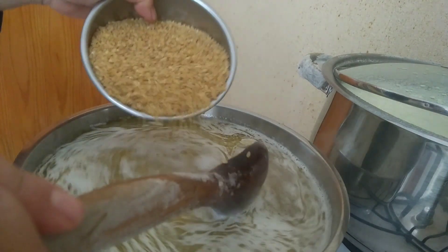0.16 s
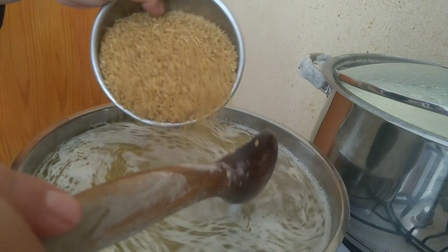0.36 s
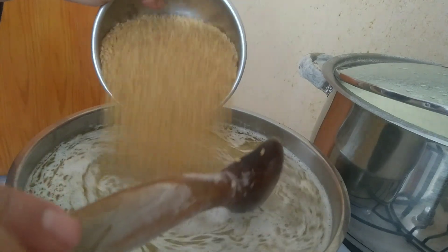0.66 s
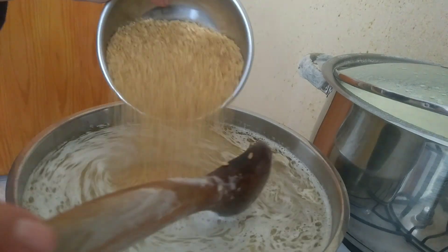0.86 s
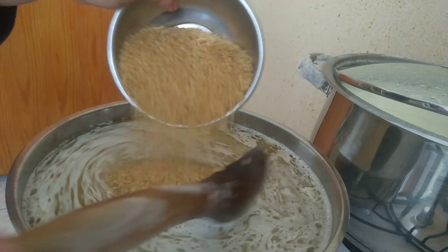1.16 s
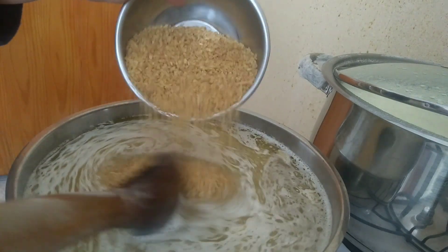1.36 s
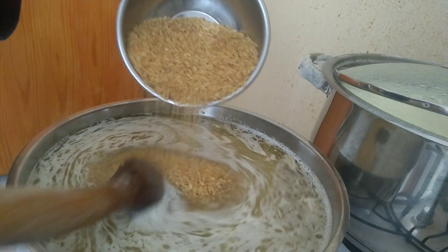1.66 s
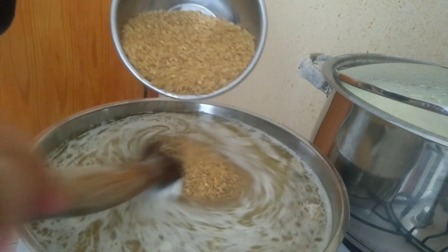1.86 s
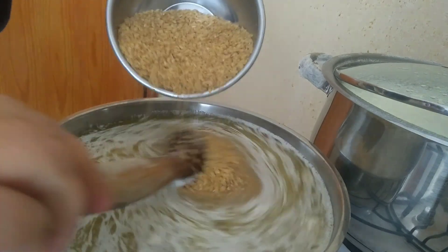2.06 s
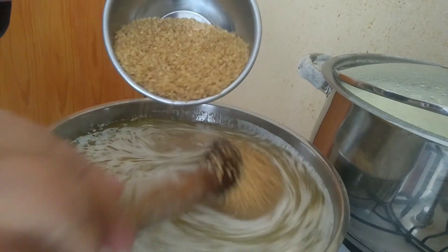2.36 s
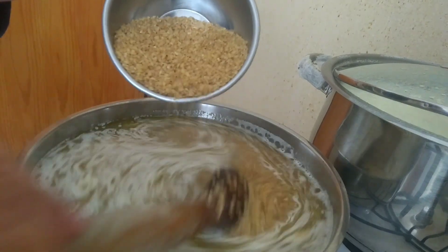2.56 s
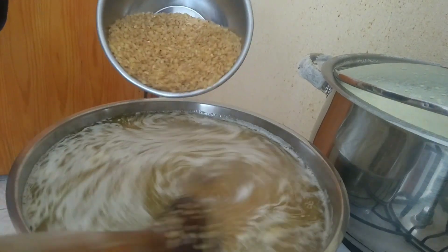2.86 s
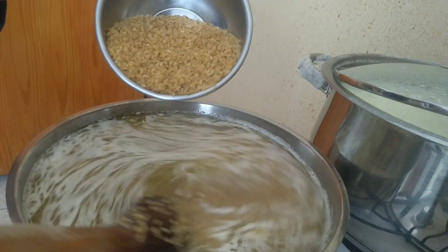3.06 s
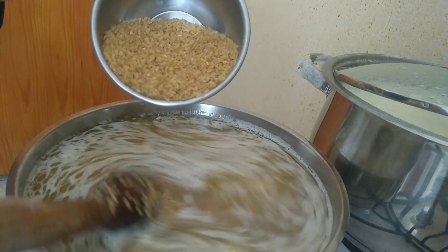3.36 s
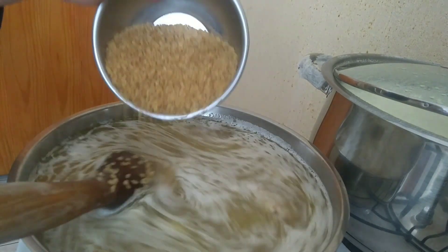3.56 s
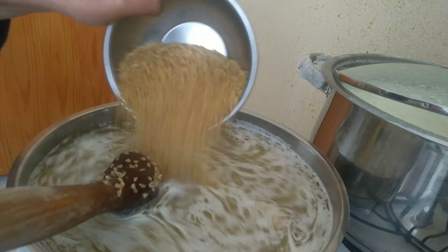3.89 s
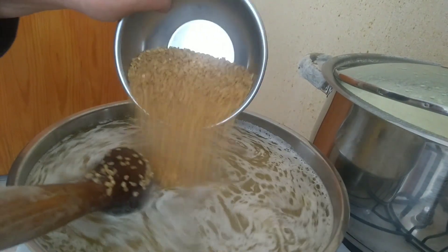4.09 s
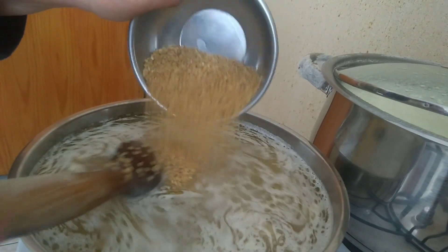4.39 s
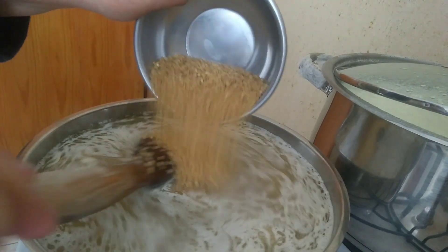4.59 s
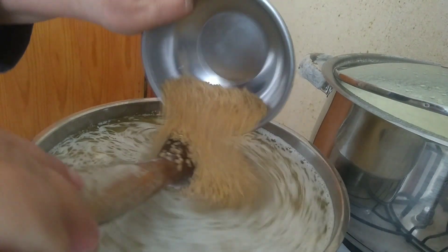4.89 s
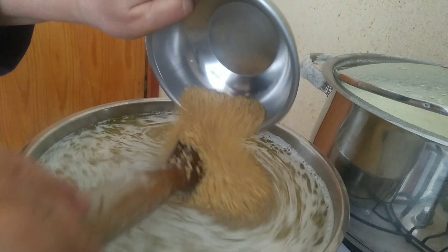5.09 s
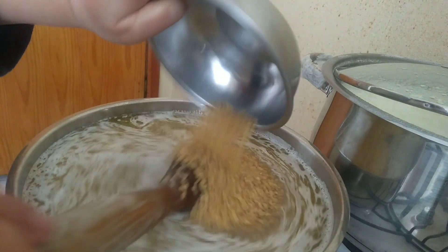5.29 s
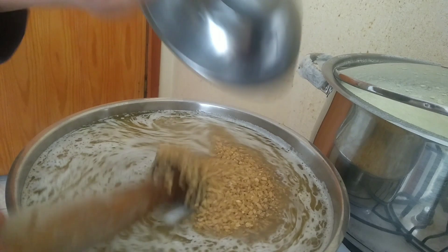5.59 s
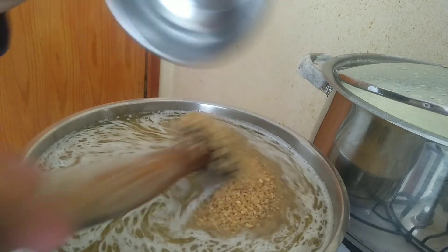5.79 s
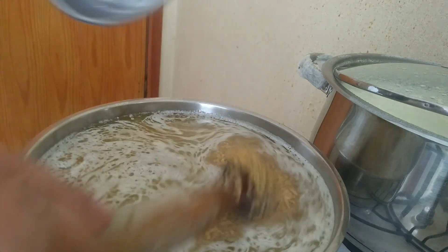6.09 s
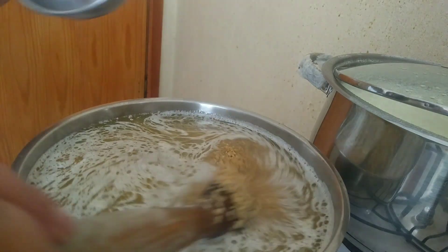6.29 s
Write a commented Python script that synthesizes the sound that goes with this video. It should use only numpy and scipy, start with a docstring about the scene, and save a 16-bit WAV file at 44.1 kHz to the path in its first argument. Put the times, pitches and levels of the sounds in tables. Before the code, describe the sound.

Beside a quietly simmering pot, grain slides and then pours sharply, a dense crisp patter on steel over watery plops. It trickles away into ticks. A wooden spoon raps the pot in a quick cluster, drags, and flicks foam. Grain pours again, longer and uneven, with a metallic singing edge, then stops. Faint splashes, a small spill of grains and muted knocks finish. Near stereo microphone, short kitchen reverberation.

```python
"""Dry bulgur slides from a steel bowl into a big pot of simmering broth, in two pours, in a small kitchen.
Each grain is a click that rings briefly: thousands a second patter on steel, plop in broth and fizz in foam.
A wooden spoon knocks on the pot as noise scuffs and ringing modes, drags as slips and splashes as noise bursts.
Big steam bubbles thud as low tones; behind them lie the stove's coloured noise, a simmer and a mains hum.
A stereo pair of microphone ports hears it: the struck pot wall is nearer to the right one."""
import sys
import numpy as np
from scipy import signal
from scipy.fft import rfft, irfft
from scipy.io import wavfile

SR = 44100
rng = np.random.default_rng(int(sys.argv[2]) if len(sys.argv) > 2 else 0)


def file_out(sig):
    """Save sig as 16-bit WAV at sys.argv[1]."""
    # one column per channel
    cols = np.atleast_2d(sig).T
    # limit, then scale
    lim = np.clip(cols, -1, 1)
    pcm = np.round(lim * 32767).astype(np.int16)
    wavfile.write(sys.argv[1], SR, pcm)


N = 283993
TIME = np.arange(N) / SR

# how long the small kitchen lingers: band_hz, t60_s
KITCHEN_DECAY = [(150, 0.42), (600, 0.27), (2000, 0.45), (6000, 0.26), (15000, 0.22)]


def from_db(db):
    """Decibels to gain."""
    return 10 ** (np.asarray(db) / 20)


def rms_one(x):
    """Scale to rms 1."""
    return x / np.sqrt(np.mean(x ** 2) + 1e-20)


def at_hz(points, hz):
    """Read a table on a log-frequency axis."""
    points = np.array(points)
    return np.interp(np.log(np.maximum(hz, 1)), np.log(points[:, 0]), points[:, 1])


def colour(x, spectrum, size=4096):
    """Causal (minimum-phase) filter with the given spectrum."""
    cepstrum = irfft(np.log(from_db(at_hz(spectrum, np.fft.rfftfreq(size, 1 / SR)))))
    # fold the cepstrum forward in time
    cepstrum[1:size // 2] *= 2
    cepstrum[size // 2 + 1:] = 0
    kernel = irfft(np.exp(rfft(cepstrum)))
    return signal.fftconvolve(np.atleast_2d(x), kernel[None], axes=1)[:, :x.shape[-1]]


def drift(rate):
    """Random wander: straight lines between knots of rms 1, `rate` knots a second."""
    knots = rng.standard_normal(int(N / SR * rate) + 2)
    return np.interp(TIME * rate, np.arange(len(knots)), rms_one(knots))


def resonate(x, hz, width_hz):
    """A resonance with gain 1 on top."""
    r = np.exp(-np.pi * width_hz / SR)
    feedforward = np.array([1, 0, -1]) * (1 - r * r) / 2
    feedback = [1, -2 * r * np.cos(2 * np.pi * hz / SR), r * r]
    return signal.lfilter(feedforward, feedback, x + 1e-18)


def ring_modes(x, modes):
    """Sum of resonances given as mode_hz, width_hz, level_db."""
    return sum(from_db(db) * resonate(x, hz, width_hz) for hz, width_hz, db in modes)


def band_pass(x, low_hz, high_hz):
    """Second-order band filter."""
    return signal.sosfilt(signal.butter(2, [low_hz, high_hz], "band", fs=SR, output="sos"), x)


def diffuse(size):
    """Stereo noise, alike in the bass and unrelated in the treble."""
    # side noise against mid noise: band_hz, side_db
    width = [(50, -41), (125, -20), (250, -11), (500, -4.5), (1000, -1), (2000, -0.5), (4000, -1.5),
             (15000, 0)]
    mid, side = rng.standard_normal((2, size))
    return (mid + colour(side, width) * [[1], [-1]]) / np.sqrt(2)


def burst(decay_s, size=4096):
    """A contact: stereo noise dying at once, mean energy 1 per channel."""
    x = diffuse(size) * np.exp(-np.arange(size) / SR / decay_s)
    return rms_one(x) / np.sqrt(size)


def add(out, s, x):
    """Mix a sound in at time s."""
    start = max(int(s * SR), 0)
    out[:, start:start + x.shape[1]] += x[:, :N - start]


def kitchen(x, wet_db, size=26000):
    """Direct sound plus a diffuse tail that dies octave by octave."""
    t, noise, tail = np.arange(size) / SR, diffuse(size), 0
    edges_hz = 65 * 2. ** np.arange(9)
    for low_hz, high_hz in zip(edges_hz, edges_hz[1:]):
        t60_s = at_hz(KITCHEN_DECAY, np.sqrt(low_hz * high_hz))
        tail = tail + band_pass(noise, low_hz, high_hz) * from_db(-60 * t / t60_s)
        noise = diffuse(size)
    tail = rms_one(tail * np.clip(t / 0.0022, 0, 1)) / np.sqrt(size)
    return x + from_db(wet_db) * signal.fftconvolve(x, tail, axes=1)[:, :N]


def place(x, side):
    """Tilt stereo sound between the ports, band by band, roughly keeping its power."""
    left = [(hz, db - 10 * np.log10((1.5 + 10 ** (db / 10)) / 2)) for hz, db in side]
    right = [(hz, -10 * np.log10((2 + 10 ** (db / 10)) / 2)) for hz, db in side]
    return np.vstack([colour(x[0], left), colour(x[1], right)])


def in_time(rows):
    """Join (s, dB) rows by straight lines, as a gain that dies away outside them."""
    edge_s = 0.063
    s, db = np.transpose(rows)
    outside_s = np.maximum(np.maximum(s[0] - TIME, TIME - s[-1]), 0)
    return from_db(np.interp(TIME, s, db)) * np.exp(-outside_s / edge_s)


def bell_swells(rows):
    """Sum of bell-shaped swells given as centre_s, level_db, half_s (half length to 1/e)."""
    return sum(from_db(db) * np.exp(-((TIME - s) / half_s) ** 2) for s, db, half_s in rows)


def stove():
    """Burner rumble, a faint, fitful simmer coloured by the pot, and a slightly wavering hum."""
    # colour of the burner rumble: band_hz, level_db
    rumble_colour = [(25, -6), (45, -6), (70, -3.5), (105, -1), (140, 7.5), (180, -9), (260, -9.5),
                     (450, -22.5), (800, -24), (1600, -32), (2300, -36.5), (6000, -34.5), (9000, -44.5),
                     (15000, -69)]
    # pot resonances over the simmer: mode_hz, width_hz, level_db
    simmer_modes = [(839, 14, -2), (1630, 66, -1), (2823, 15, 1.5), (3405, 58, -7)]
    # mains hum: pitch_hz, rms_db
    hum_tones = [(49.2, -59), (99.5, -70.5)]
    rumble = from_db(-64.5) * rms_one(colour(diffuse(N), rumble_colour))
    fizz = diffuse(N)
    simmer = sum(from_db(db + 6.2 * drift(12)) * resonate(fizz, hz, width_hz)
                 for hz, width_hz, db in simmer_modes)
    hum = 0
    for hz, db in hum_tones:
        level = np.sqrt(2) * from_db(db + 0.5 * drift(0.29))
        hum = hum + level * np.sin(2 * np.pi * hz * TIME + 0.44 * drift(1.1))
    return rumble + from_db(-75.5) * rms_one(simmer) + hum


def thuds():
    """Steam bubbles swell and collapse at the bottom in a few low cycles, with one overtone."""
    # big steam bubbles: start_s, level_db (before a 5 dB trim), pitch_hz
    bubbles = [(0.759, -45.5, 100), (0.832, -46, 145), (3.18, -62, 142.5), (3.649, -46, 142.6),
               (3.755, -47, 144), (4.823, -39.5, 141.5), (5.17, -47.5, 127), (5.979, -51, 134)]
    out, t = np.zeros((2, N)), np.arange(SR // 4) / SR
    swell = t / 0.011   # fullest after 11 ms
    for s, db, hz in bubbles:
        tone = np.sin(2 * np.pi * hz * t) + from_db(-13.5) * np.sin(2 * np.pi * 1.546 * hz * t)
        add(out, s, from_db(db - 5.0) * (swell * np.exp(1 - swell) * tone)[None])
    return out


def judder():
    """The spoon drags over the bottom in quick, nearly regular slips that make the pot groan."""
    # drags of the spoon: centre_s, level_db, half_s
    drags = [(2.697, -59.5, 0.031), (2.871, -44, 0.035), (2.941, -55, 0.0077)]
    # colour of the groan: band_hz, level_db
    groan_colour = [(80, -33), (146, -8), (220, 0.5), (293, 2.5), (375, -2.5), (450, -16), (513, -15.5),
                    (700, -18), (1400, -32), (3000, -50), (8000, -80)]
    slips_per_s, waver = 73.3, 0.016
    slip_count = np.cumsum(slips_per_s * (1 + waver * drift(40))) / SR
    slips = np.diff(np.floor(slip_count), prepend=0)   # one click per whole count
    groan = rms_one(colour(slips * from_db(1.5 * drift(70)), groan_colour))
    return kitchen(np.vstack([groan, groan]) * bell_swells(drags), wet_db=-14.5)


def contacts():
    """Every knock, and the weaker second touch after each soft one."""
    # spoon on pot, relative levels: start_s, knock_db, boom_db (low), crack_db (bright), pitch_hz, drag_s
    knocks = [(.002, -44.5, -47, -50, 745, 0.0035), (0.029, -50, -60, -54, 570, 0.011),
              (2.202, -49.5, -44.5, -68, 800, 0.005), (2.709, -38.5, -62, -38.5, 680, 0.0033),
              (2.739, -33, -30, -29.5, 1270, 0.0019), (2.760, -43, -40, -53, 695, 0.0047),
              (2.794, -37.5, -28.5, -29.5, 714, 0.002), (5.018, -64, -74, -66, 630, 0.011),
              (5.038, -47.5, -65, -51.5, 658, 0.013), (5.069, -47.5, -46.5, -52.5, 718, 0.013),
              (5.174, -46, -61.5, -52, 560, 0.021), (6.278, -43, -87, -45, 703, 0.0098),
              (6.298, -46, -83, -63, 830, 0.005), (6.339, -46, -92, -51, 734, .003),
              (6.372, -54, -84, -66, 750, 0.003)]
    rebound_s, loss_db, soft_below_db = 0.033, 6.5, -46
    rebounds = []
    for s, knock_db, boom_db, crack_db, hz, drag_s in knocks:
        if knock_db < soft_below_db:
            again_s = s + rebound_s * rng.uniform(.8, 1.2)
            rebounds.append((again_s, knock_db - loss_db, boom_db - loss_db, crack_db - loss_db, hz, drag_s))
    return knocks + rebounds


def touch(contact, drag_s, size):
    """Wood meets steel: a short scuff whose start is cushioned by the broth."""
    # colour of wood on steel: band_hz, level_db
    wood_colour = [(120, -9), (200, 8.5), (320, -33), (430, -3.5), (520, -0.5), (700, -2), (950, 1.5),
                   (1350, 1.5), (1800, -3.5), (2130, 2), (2600, -5.5), (4200, -5), (6100, -1.5),
                   (8500, -20.5), (12000, -22), (15000, -52)]
    blow = burst(decay_s=drag_s)[0]
    blow = blow * np.clip(np.arange(len(blow)) / SR / (0.17 * drag_s), 0, 1)
    scuff = colour(colour(blow, wood_colour), contact)[0]
    return np.pad(from_db(37.0) * scuff, (0, size - len(blow)))


def spoon():
    """Wood strikes the pot: a short crack, dull under the broth, a hollow knock and the pot's own modes."""
    # hollow of the pot above the broth, heard in soft knocks: mode_hz, width_hz, level_db
    hollow_modes = [(570, 113, 2.5), (676, 150, -1.5), (750, 82, 1), (845, 92, -5), (1250, 340, -4.5),
                    (1590, 140, 0), (2800, 310, 12), (3520, 220, 8), (4400, 150, 11.5)]
    # modes of the filled pot: mode_hz, level_db (against the contact), t60_s
    pot_modes = [(135, -17.5, 0.19), (199, -16, 0.1), (232, -12.5, 0.34), (301, -1.5, 0.13),
                 (341, -4, 0.15), (366.3, -3.5, 0.19), (499, -12, 0.24), (660, -13, 0.14),
                 (1150, -16, 0.31), (1471, -5.5, 0.13), (1436, -22, 0.2), (2190, -35, 0.23)]
    hard_from_db, hard_range_db, soft_crack_share = -36.5, 8, 0.34
    out, t = np.zeros((2, N)), np.arange(SR // 2) / SR
    for s, knock_db, boom_db, crack_db, hz, drag_s in contacts():
        top_db = crack_db + 2.6 * min(crack_db - knock_db, 0)   # a padded blow loses its top first
        contact = [(350, boom_db - 5.5), (560, knock_db), (1650, knock_db - 2.5),
                   (3000, crack_db - 7.0), (6000, top_db - 5.5)]
        # the harder the blow, the more bare crack and the less hollow
        hardness = np.clip((crack_db - hard_from_db) / hard_range_db, 0, 1)
        crack_share = soft_crack_share + (1 - soft_crack_share) * hardness
        wood = touch(contact, drag_s, len(t))
        hit = crack_share * wood + (1 - hardness) * ring_modes(wood, hollow_modes)
        knock = np.sin(2 * np.pi * hz * t) * np.exp(-t / 0.011)
        hit += from_db(knock_db - 6.0 * hardness) * knock
        # scattered back by the wall just behind the pot
        wall_echo = from_db(2) * crack_share * touch(contact, drag_s, len(t))
        add(out, s + .0042, wall_echo[None])
        for mode_hz, db, t60_s in pot_modes:
            strength = from_db(at_hz(contact, mode_hz) + db - 0.5 + rng.normal(0, 1))
            tone = np.sin(2 * np.pi * (mode_hz * t + rng.random()))
            hit += strength * tone * np.exp(-np.log(1000) * t / t60_s)
        # the struck wall is nearer to the right port
        late_left = np.interp(t - .00028, t, hit, left=0)
        add(out, s + .001, np.array([late_left, hit]))
    return kitchen(out, wet_db=-2.5)


def splashes():
    """The spoon turns over foam in short bursts of sparse noise through a broad resonance."""
    # small splashes from the stirring: start_s, level_db, pitch_hz, rise_s, decay_s
    foam_bursts = [(3.033, -56, 2800, 0.0016, 0.042), (3.216, -61, 3450, 0.0046, 0.042),
                   (3.21, -64, 5980, 0.008, 0.02), (3.565, -50.5, 920, 0.065, 0.041),
                   (5.624, -55.5, 5500, 0.034, 0.05), (5.747, -66, 5140, 0.005, 0.097)]
    out, t = np.zeros((2, N)), np.arange(SR // 4) / SR
    for s, db, hz, rise_s, decay_s in foam_bursts:
        drops = diffuse(len(t)) * (rng.random(len(t)) < 4000 / SR)   # 4000 drops a second
        fizz = rms_one(resonate(resonate(drops, hz, hz / 2), hz, hz / 2))
        add(out, s, from_db(db) * fizz * (1 - np.exp(-t / rise_s)) * np.exp(-t / decay_s))
    return out


def grain_flow():
    """All moving grain, and the part of it that skitters fast over the steel."""
    # flow of grain over the lip of the bowl: time_s, level_db
    first_pour = [(.41, -67.5), (.465, -51.5), (.55, -45), (.64, -37), (.72, -39.5), (.93, -43),
                  (1.07, -47), (1.15, -50.5), (1.28, -49), (1.35, -47), (1.58, -47.5), (1.78, -49),
                  (1.98, -54), (2.05, -52.5), (2.18, -55), (2.25, -54.5), (2.42, -58.5), (2.58, -69)]
    second_pour = [(3.5, -75.5), (3.579, -62.5), (3.605, -51), (3.69, -52), (3.729, -43), (3.79, -46.5),
                   (3.858, -42.5), (3.96, -40), (4.03, -41.5), (4.1, -42), (4.15, -40.5), (4.21, -43),
                   (4.29, -43.5), (4.35, -46), (4.42, -43.5), (4.52, -46), (4.58, -46), (4.679, -49),
                   (4.79, -50), (4.87, -50), (5.32, -50), (5.471, -55.5), (5.58, -74)]
    last_grains = [(5.87, -78.5), (5.928, -64.5), (5.995, -49.5), (6.069, -57.5), (6.141, -61),
                   (6.209, -67)]
    # dry ticks against the flow, one for each of the three streams: level_db
    tick_levels = [-6.5, -8.5, -7]
    # grain slides slowly in the tilted bowl at the start; later loose grain and foam rustle:
    # centre_s, level_db, half_s
    rustles = [(0.09, -53.5, 0.46), (2.682, -60.5, 0.07), (2.928, -57, 0.094), (3.226, -77, 0.051),
               (5.706, -75, 0.024), (5.784, -74.5, 0.14), (6.396, -65, 0.045)]
    skitter_from = from_db(-60)   # a slower flow hardly skitters
    streams = [in_time(rows) for rows in (first_pour, second_pour, last_grains)]
    rustle = bell_swells(rustles)
    skitter = from_db(-19) * rustle
    for x, db in zip(streams, tick_levels):
        skitter = skitter + from_db(db) * x ** 3 / (x ** 2 + skitter_from ** 2)
    surge = from_db(.8 * drift(45))
    return (sum(streams) + rustle) * surge + 1e-9, skitter * surge


def strays(flow):
    """Lone grains click on the steel: a cycle or two of snap, then a millisecond of chatter."""
    # single grains heard hitting steel, at set times: start_s, level_db (relative), pitch_hz
    set_grains = [(.137, -43, 6200), (0.154, -32, 6000), (0.24, -47, 7600), (1.413, -26, 5940),
                  (1.766, -19, 6900), (1.923, -31, 11600), (2.016, -29, 6210), (2.098, -28.5, 6100),
                  (2.209, -27, 6600), (2.217, -24.5, 6670), (2.303, -29.5, 6300), (2.491, -35, 5700),
                  (2.961, -35.5, 6000), (3.041, -33, 6150), (3.061, -29.5, 6000), (3.124, -35.5, 6400),
                  (3.218, -44, 6100), (3.601, -35.5, 6100), (3.675, -21, 5600), (3.713, -21, 7140),
                  (5.648, -41, 5400), (5.75, -39, 5330), (5.906, -38.5, 6500)]
    per_s, over_flow_db, top_db, spread_db = 50, 10.5, -25, 5.5   # drawn grains; top before the spread
    mean_hz, spread_hz = 6300, 1400
    out, t = np.zeros((2, N)), np.arange(400) / SR
    swell = t / .00018
    draws = rng.random((400, 2))
    drawn_grains = []
    for (when, luck), (size, pitch) in zip(draws, rng.standard_normal(draws.shape)):
        if luck < per_s * N / SR / len(draws):
            flow_db = 20 * np.log10(flow[int(when * N)])
            db = min(flow_db + over_flow_db, top_db) + spread_db * size
            drawn_grains.append((when * N / SR, db, mean_hz + spread_hz * pitch))
    for s, db, hz in set_grains + drawn_grains:
        snap = np.sin(2 * np.pi * hz * t) * swell * np.exp(1 - swell)
        chatter = resonate(resonate(burst(decay_s=0.0023, size=400), hz, 1900), hz, 1900)
        add(out, s, from_db(db) * (0.25 * snap + 5.4 * chatter))
    return kitchen(out, wet_db=-4.5)


def grains(per_s, spread_db, clump_db, cycles, low_hz, high_hz, wet_db, count=14):
    """Uneven random impacts ring a few cycles, each at its pitch and place; echoes blur to a wash; rms 1."""
    chance = np.clip(per_s / SR, 1e-4, 1)
    size_db = spread_db * np.minimum(rng.exponential(1, N), 4) + clump_db * drift(130)
    sizes = from_db(size_db) * rng.choice([-1, 1], N)
    clicks = sizes * (rng.random(N) < chance) / np.sqrt(chance)
    dealt, out = rng.integers(0, count, N), np.zeros((2, N))   # each click is dealt one pitch
    for k, hz in enumerate(np.geomspace(low_hz, high_hz, count)):
        ring = resonate(clicks * (dealt == k), hz, hz / cycles)
        lag, pan = rng.integers(4, 8), from_db(rng.normal(0, 1.0))   # the sound reaches the left port first
        out += [ring * pan, np.roll(ring, lag) / pan]
    # power kept from one sample to the next in the kitchen
    keep = from_db(-60 / (at_hz(KITCHEN_DECAY, np.sqrt(low_hz * high_hz)) * SR)) ** 2
    lingering = np.sqrt(signal.lfilter([1], [1, -keep], out[0] ** 2))
    wash = band_pass(diffuse(N), low_hz, high_hz)
    return rms_one(rms_one(out) + from_db(wet_db) * rms_one(wash * lingering))


def plunge():
    """Where the stream falls thick it tears the foam open: a dense fizz of tiny bubbles."""
    # thick parts of the stream, one list for each plunge: time_s, level_db
    plunges = [
        [(.45, -82), (.475, -60.5), (.65, -51.5), (.78, -58.5), (.92, -62), (1.08, -78)],
        [(3.7, -77), (3.73, -59), (3.8, -67), (3.88, -54), (4.13, -56.5), (4.35, -65.5), (4.55, -68),
         (4.72, -78)],
        [(5.03, -73), (5.08, -69), (5.25, -74), (5.42, -89)],
    ]
    # colour of the fizz: band_hz, level_db
    fizz_colour = [(900, -18), (1600, -13), (2100, 5.5), (2600, 5), (4000, -24.5)]
    fizz = grains(3500, spread_db=1.5, clump_db=5.5, cycles=3.1, low_hz=1670, high_hz=2850,
                  wet_db=-4.0, count=7)
    return sum(in_time(rows) for rows in plunges) * rms_one(colour(fizz, fizz_colour))


def open_broth(flow):
    """Share of the sound left to the liquid: poured grain piles up in a heap that slowly sinks."""
    sink_s, muffle_db = 4, 16.5   # the muffling is for the highest heap
    heap = signal.lfilter([1], [1, -np.exp(-1 / (sink_s * SR))], flow)
    return from_db(-muffle_db * heap / heap.max())


def pour(flow, skitter):
    """Grains patter, tick, plop and set the bowl ringing; a louder stream is a denser one."""
    # colours of grain on steel, fast ticks and plops in broth: band_hz, level_db
    patter_colour = [(1500, -40), (2300, -44.5), (2800, -6.5), (3200, -8.5), (3650, -3), (4200, -3),
                     (5300, 0), (6300, 1), (7500, -2.5), (8800, -9.5), (10000, -26), (14000, -41)]
    tick_colour = [(4000, -48.5), (8000, -1.5), (9500, 5.5), (11000, 8), (12500, 6), (15800, 4)]
    plop_colour = [(600, -37.5), (760, -23), (880, -2.5), (1100, -11.5), (1330, 7.5), (1500, -2.5),
                   (1680, 1.5), (1900, -2.5), (2300, -18.5), (2800, -6.5), (3600, -14.5), (6000, -10)]
    # bowl and pot ringing under the grains, and high modes of the bowl: mode_hz, width_hz, level_db
    bowl_modes = [(886, 88, -14), (1259, 34, -1.5), (1626, 116, -11), (2740, 210, -11), (3340, 120, -6)]
    bowl_top_modes = [(3130, 20, 1), (3540, 55, 1), (5100, 50, -12.5), (5500, 28, -8), (5940, 32, -9),
                      (6220, 34, 0), (6450, 74, -5), (7050, 97, -11)]
    # where steel and broth sit between the ports: band_hz, left_minus_right_db (approximate)
    steel_side = [(3500, -2.5), (5200, 1), (6200, 4), (7500, -0.5), (9000, -3.5), (10500, -10),
                  (12000, -0.5), (15000, -3.5)]
    broth_side = [(860, 21), (1050, -9.5), (1240, 18.5), (1420, -6.5), (1620, -20), (1780, -21),
                  (2050, -7.5), (2800, 5.5)]
    patter_db, plop_db, ring_db = 2, -5, -11   # against the flow, on open broth
    bare_tick_db, bare_ring_db = 5.5, 13.5   # gained as the steel is laid bare
    fullness = flow / from_db(-44)   # 1 at the reference flow
    per_s = 9500 * fullness ** .75   # impacts; a trickle thins out into single ticks
    dry = grains(per_s, spread_db=2.5, clump_db=2.5, cycles=9.7, low_hz=2220, high_hz=15500, wet_db=1.5)
    wet = grains(per_s * .5, spread_db=3.5, clump_db=2.0, cycles=34.0, low_hz=800, high_hz=4110,
                 wet_db=-5.5, count=19)

    patter = colour(dry, patter_colour)
    patter = flow * from_db(patter_db) * rms_one(patter + ring_modes(patter, bowl_top_modes))
    # the emptying bowl is less damped and sings
    bare = np.interp(TIME, [4.2, 4.6, 5.3, 5.5], [0, 1, 1, 0])
    patter = patter + 0.47 * bare * resonate(patter, 5930, 220)
    # with no bed of grain left the patter is thin
    empty = np.interp(TIME, [5.35, 5.65], [0, 1])
    thin = signal.sosfilt(signal.butter(4, 4400, "high", fs=SR, output="sos"), patter)
    patter = (1 - empty) * patter + empty * thin

    ticks = skitter * from_db(patter_db + bare_tick_db * bare) * rms_one(colour(dry, tick_colour))
    landing = flow * open_broth(flow)
    # a thick stream plunges deeper and plops more
    plops = landing * fullness ** 0.26 * from_db(plop_db) * rms_one(colour(wet, plop_colour))
    ring = landing * from_db(ring_db + bare_ring_db * bare) * rms_one(ring_modes(wet, bowl_modes))
    return place(patter + ticks, steel_side) + place(plops + ring, broth_side)


def scene():
    """Everything at the stove."""
    flow, skitter = grain_flow()
    background = stove() + thuds()
    stirring = judder() + spoon() + splashes()
    return background + stirring + strays(flow) + plunge() + pour(flow, skitter)


def record(dry):
    """The top is cut steeply above 15.9 kHz."""
    return signal.sosfilt(signal.ellip(10, .1, 80, 15900, fs=SR, output="sos"), dry)


dry = scene()
out = record(dry)
file_out(out)
```